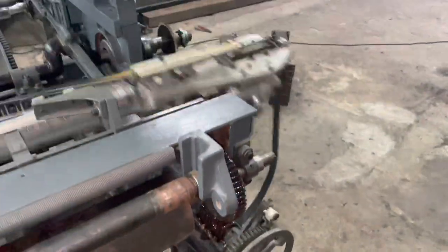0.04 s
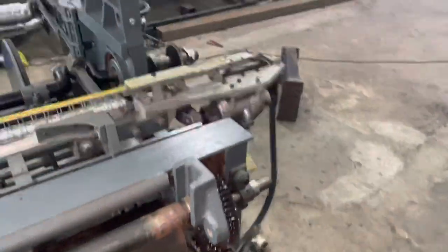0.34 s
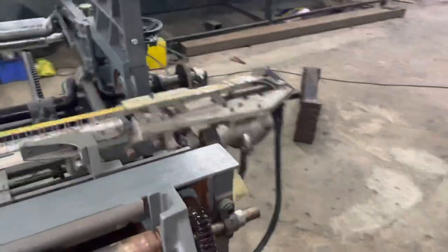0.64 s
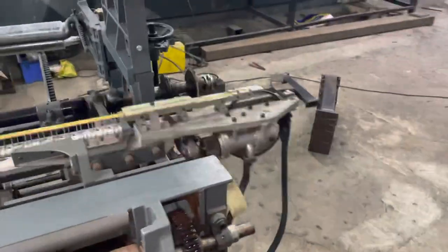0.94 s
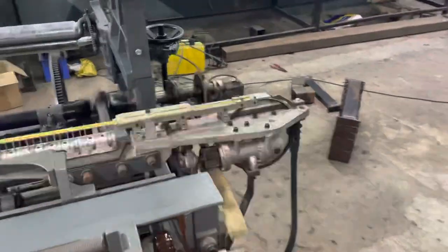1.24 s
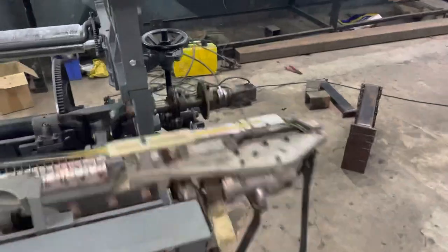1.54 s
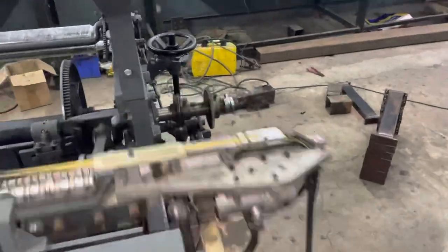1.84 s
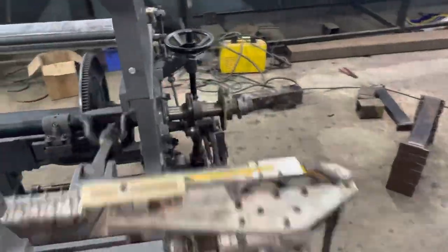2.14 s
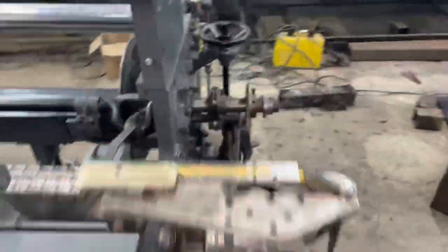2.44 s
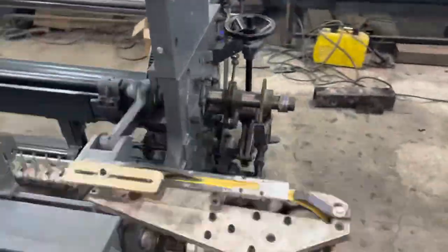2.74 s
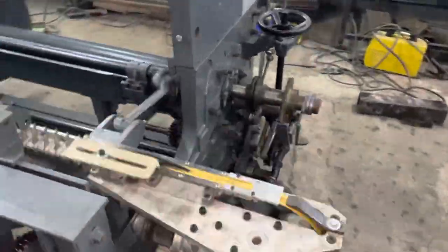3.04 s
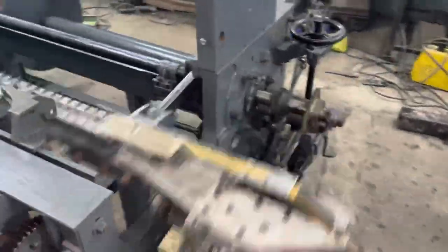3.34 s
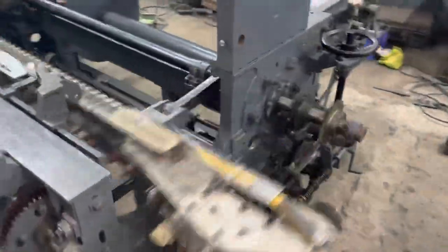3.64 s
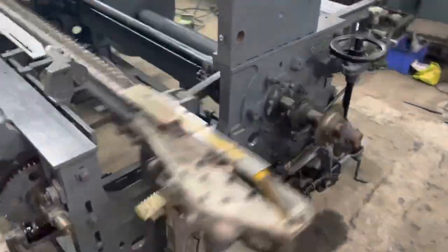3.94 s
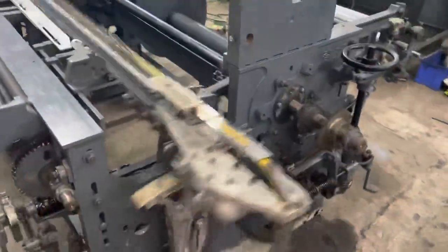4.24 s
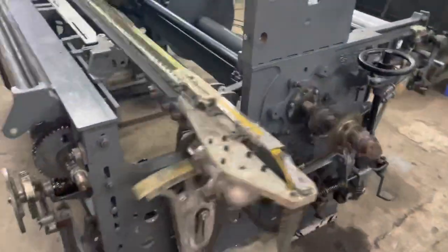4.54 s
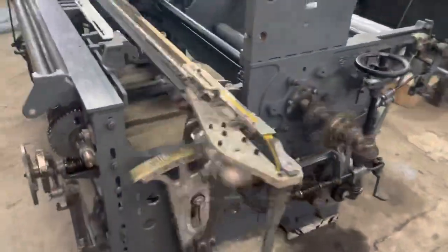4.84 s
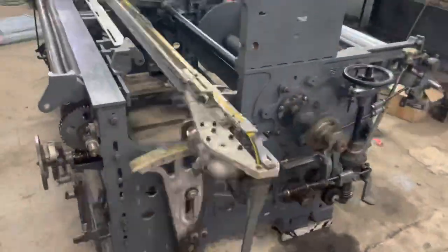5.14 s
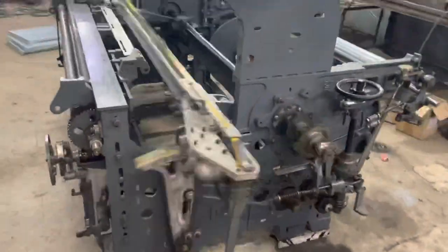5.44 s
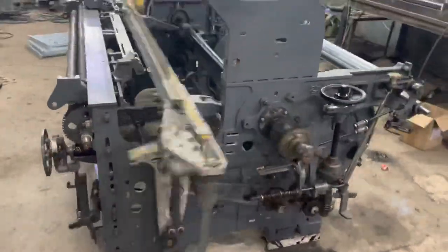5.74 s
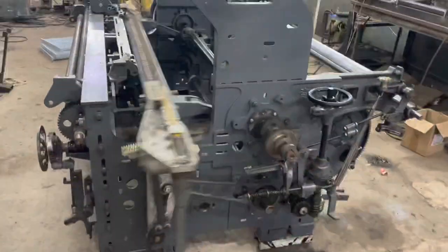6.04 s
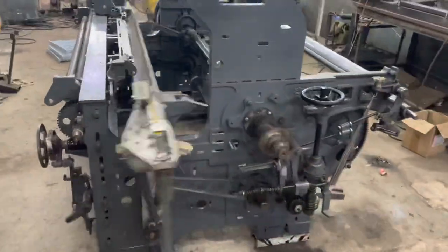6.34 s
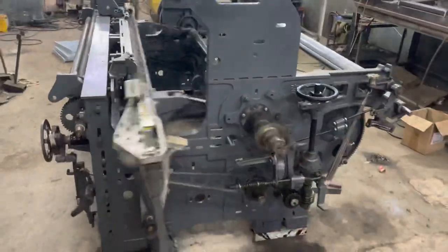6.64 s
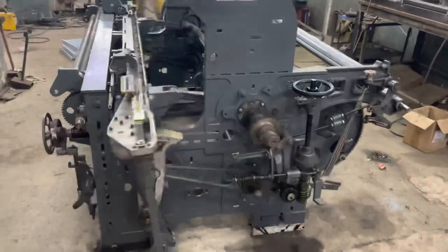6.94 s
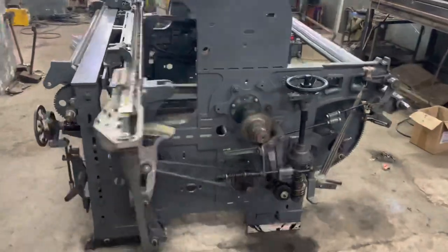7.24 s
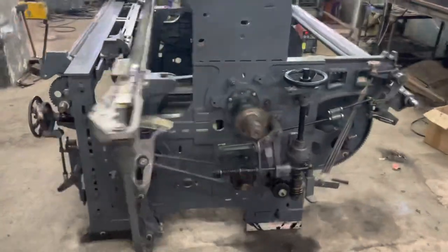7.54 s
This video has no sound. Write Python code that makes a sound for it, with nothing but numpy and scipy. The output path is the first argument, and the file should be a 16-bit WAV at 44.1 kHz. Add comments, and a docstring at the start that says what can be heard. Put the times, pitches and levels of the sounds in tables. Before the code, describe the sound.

Regular metallic beats and hollow knocks from a running loom, with gear grind, sliding hiss and motor hum in a concrete room.

```python
"""A concrete workshop, heard while walking round the end of a rapier loom.
The heavy frame rumbles and the motor hums. About three times a second a tape carries the thread across:
one "pick". Each pick brings a steel clash as the drive reverses, a tick from the tape guide, a hollow
knock from loose joints and a tiny squeak; then the gears growl and the tape slides out."""
import sys
import numpy as np
from scipy import signal
from scipy.fft import rfft, irfft, next_fast_len
from scipy.io import wavfile

SR = 44100
rng = np.random.default_rng(int(sys.argv[2]) if len(sys.argv) > 2 else 0)


def materialize(psi):
    """Save the field psi as 16-bit PCM at rate SR to the path in sys.argv[1].

    A 1-D psi becomes a single channel; in a 2-D psi each row is a channel.
    """
    bounded = np.clip(np.atleast_2d(psi).T, -1, 1)
    quanta = np.round(bounded * 32767).astype(np.int16)
    wavfile.write(sys.argv[1], SR, quanta)


N = 334278
TIME = np.arange(N) / SR
FFT_SIZE = next_fast_len(N + SR, real=True)
FREQS = np.arange(FFT_SIZE // 2 + 1) * SR / FFT_SIZE
FIRST_CLASH_S, PICK_S = 0.06495, 0.324737  # the crank turns steadily, one pick a turn


def from_db(db):
    """Turn decibels into a gain."""
    return 10 ** (np.asarray(db) / 20)

def along(rows, t=TIME):
    """Each column of a curve, read at the times t."""
    times, *columns = np.transpose(rows)
    return [np.interp(t, times, column) for column in columns]

def over_hz(points):
    """Join a table's points into a curve over all frequencies."""
    hz, value = np.transpose(points)
    return np.interp(np.log(FREQS + 1e-3), np.log(hz), value)

def colour(x, spectrum):
    """Make some broad ranges of pitch louder than others."""
    return irfft(rfft(x, FFT_SIZE) * from_db(over_hz(spectrum)), FFT_SIZE)[:, :N]

def resonate(force, modes):
    """Make a part ring at its own notes (modes); narrower ones ring longer."""
    out = 0
    for k, (hz, width, db) in enumerate(modes):
        r = np.exp(-np.pi * width / SR)
        gain = (-1) ** k * from_db(db) * (1 - r * r) / 2
        feedback = [1, -2 * r * np.cos(2 * np.pi * hz / SR), r * r]
        out = out + signal.lfilter([gain, 0, -gain], feedback, force + 1e-18)
    return out

def noise():
    """Two unrelated channels of even hiss."""
    return rng.standard_normal((2, N)) * np.sqrt(SR / 2)

def scatter(shape):
    """Random numbers between -2 and 2, mostly small."""
    return np.clip(rng.standard_normal(shape), -2, 2)

def chatter(per_s, spread_db):
    """The force of many tiny contacts of uneven strength."""
    contact = np.cumsum(rng.random(N) < per_s / SR)
    strength = from_db(spread_db * scatter(N + 1))[contact]
    return noise() * strength / np.sqrt(np.mean(strength ** 2))

def blows(rows, rise_s, hold_s, t60):
    """The outline of each blow: it builds, holds, then fades by 60 dB in t60 seconds."""
    out = np.zeros(N)
    for s, db in rows:
        near = slice(*np.searchsorted(TIME, [s - rise_s, s + hold_s + t60]))
        age = TIME[near] - s
        fade = np.exp(-np.log(1000) * np.maximum(age - hold_s, 0) / t60)
        out[near] += np.minimum(1 + age / rise_s, 1) * from_db(db) * fade
    return out

def taps(rows, gain_db):
    """One clean click of force for each touch."""
    s, db = np.transpose(rows)
    out = np.zeros(N)
    out[np.round(s * SR).astype(int)] = SR * from_db(db + gain_db)
    return out

def every_pick(levels, after_clash_s, uneven_db, play_s=0.000624):
    """One contact a pick, a little uneven as the joints are loose: rows of (time [s], level [dB])."""
    s = np.arange(FIRST_CLASH_S + after_clash_s, N / SR - .01, PICK_S)
    late, harder = scatter((len(s), 2)).T
    return np.c_[s + play_s * late, along(levels, s)[0] + uneven_db * harder]


# the hall's wash of noise: (frequency [Hz], level [dB])
HALL_SPECTRUM = [(60, -62), (110, -54), (160, -54), (300, -57), (450, -58.5), (620, -60), (900, -59),
                 (1200, -63.5), (1700, -66), (3500, -71.5), (5700, -76), (7400, -75), (12000, -78.5),
                 (16000, -87)]
# how well each part is heard on the walk:
# (time [s], tape [dB], gears [dB], rubbed guide [dB], gear cover [dB])
WALK = [(0, -0.5, 0, -2.5, 5), (1, -1.5, 0.5, -1.5, -3.5), (2.2, 0.5, -0.5, -2, 6), (3, -1, 0.5, -1.5, -10),
        (3.8, -2, 1.1, -3, -4), (4.7, -3.5, 1.06, -3, 0), (5.4, -4, .5, -5, -2), (6.2, -6, 0.4, -5.5, -1),
        (7.58, -5, 0.4, -7, -2)]

def hall_wash():
    """Machine noise fills the hall, following the level of the gears."""
    _, gears_db, _, _ = along(WALK)
    return colour(noise(), HALL_SPECTRUM) * from_db(gears_db)

# the frame's deep rumble: (frequency [Hz], level [dB])
RUMBLE_SPECTRUM = [(20, -74), (32, -65), (42, -52), (52, -46.5), (70, -48), (100, -52), (135, -60),
                   (200, -67.5), (400, -105)]
# its loudness on the walk: (time [s], level [dB])
RUMBLE_LEVELS = [(0, 2.5), (1.6, -1), (2.4, -1), (3.4, -0.5), (4.4, 1.5), (5.6, -0.5), (6.4, -0.5),
                 (7.58, 0.5)]

def frame_rumble(shakes_per_s=14, shake_db=0.5):
    """The heavy frame shakes unevenly."""
    wander = np.interp(TIME * shakes_per_s, np.arange(1000), rng.standard_normal(1000))
    return colour(noise() * from_db(shake_db * wander + along(RUMBLE_LEVELS)[0]), RUMBLE_SPECTRUM)

# notes of the motor and belt: (pitch [Hz], width [Hz], level [dB])
MOTOR_MODES = [(85.4, 5.1, -42.5), (164, 26, -62.5), (396.6, 6.5, -56), (782.6, 15, -55)]
# the lowest note on the walk: (time [s], level [dB])
LOW_HUM_LEVELS = [(0, -12), (1.1, -8.5), (2.0, -0.5), (2.8, 2), (3.3, 3), (4.1, -2.5), (4.9, 0.5),
                  (5.7, -3), (6.7, -6), (7.58, -1)]

def motor_hum():
    """The motor and belt hum with a few wavering notes."""
    lowest = resonate(noise() * from_db(along(LOW_HUM_LEVELS)[0]), MOTOR_MODES[:1])
    return lowest + resonate(noise(), MOTOR_MODES[1:])

# effort during one pick: (time after the clash [s], tape friction [dB], gear load [dB])
STROKE = [(0, -13, -5), (.03, -2.5, -3.5), (.06, -9, -19.5), (.11, -12, -12), (.135, -23, -4),
          (.155, -2.5, -9.5), (.185, 1.5, -1), (.215, -0.5, -1), (.24, 0.5, -7), (.265, -5, -7),
          (.295, 0.5, -5), (.325, -1, -4)]
# the gears' growl: (frequency [Hz], level [dB])
GEAR_SPECTRUM = [(60, -75), (150, -61), (300, -60.5), (450, -58), (650, -63.5), (900, -56.5), (1600, -59.5),
                 (2200, -67.5), (3500, -69), (6000, -81.5), (16000, -100)]
# notes of the parts the gears shake: (pitch [Hz], width [Hz], level [dB])
FRAME_MODES = [(279.6, 10, -63), (391, 30, -57.5), (788, 9.5, -58), (830, 14, -52), (897, 11, -68),
               (974, 16, -60), (1032, 20, -58), (1228, 8.9, -57)]
COVER_MODES = [(1580, 77, -73), (1650, 24, -60), (2200, 250, -69.5), (1916, 35, -54), (2400, 240, -64.5),
               (2574, 50, -54.5), (3040, 880, -71)]
RAIL_MODES = [(135, 25, -52), (779, 7, -54), (915, 16, -46), (975, 25, -54), (1228, 10, -54),
              (1600, 140, -60)]
SIDE_FRAME_MODES = [(424, 54, -55.5), (508, 46, -50.5), (573, 54, -55), (1233, 12, -54.5)]
DRIVE_END_MODES = [(150, 35, -52), (443, 35, -53), (715, 15, -51), (887, 24, -50.5), (968, 28, -51.5)]
FRONT_BEAM_MODES = [(175, 22, -53), (325, 57, -52.5), (813, 33, -51), (2120, 330, -65), (2384, 72, -62),
                    (2600, 37, -54)]
# the cross rail sings as the listener passes it: (time [s], level [dB])
RAIL_LEVELS = [(2.8, -18), (3.5, -11), (3.9, -3), (4.6, -0.5), (5.6, -7.5), (6.3, -14)]
# ringing on the walk: (time [s], tape edge [dB], side frame [dB], drive end [dB], front beam [dB])
PART_LEVELS = [(0, -9, -27, -6, -4.5), (1.5, -12, -6, -20, 1), (3.2, -13, 2, -18, -11),
               (4.2, -8, -9, -18, -18), (5.2, 1, -13, -5, -8), (6.1, -14, -14, -0.5, -15),
               (7.58, -20, -10, 2.5, -18)]

def gear_growl():
    """Gear teeth grind under load and shake the frame and their sheet-metal cover."""
    _, gears_db, _, cover_db = along(WALK)
    _, load_db = along(STROKE, (TIME - FIRST_CLASH_S) % PICK_S)
    _, side, end, front = from_db(along(PART_LEVELS))
    teeth = chatter(per_s=500, spread_db=3.5) * from_db(load_db + gears_db)
    # the linkage buzzes too, most of all close to the gears
    buzz = from_db(-13) * resonate(teeth * from_db(10.5 * gears_db), LINKAGE_MODES[1:3])
    parts = [(from_db(0.9 * gears_db), FRAME_MODES), (from_db(cover_db - 7.5), COVER_MODES),
             (from_db(along(RAIL_LEVELS)[0]), RAIL_MODES), (side, SIDE_FRAME_MODES),
             (end, DRIVE_END_MODES), (front, FRONT_BEAM_MODES)]
    ringing = sum(resonate(teeth * gain, modes) for gain, modes in parts)
    return colour(teeth, GEAR_SPECTRUM) + buzz + ringing

# the tape's hiss: (frequency [Hz], level [dB])
TAPE_SPECTRUM = [(500, -61.5), (2000, -65.5), (3500, -72.5), (5000, -85), (5800, -71.5), (7500, -78),
                 (10000, -65), (12500, -69.5), (16000, -79)]
# notes of its rubbed edge: (pitch [Hz], width [Hz], level [dB])
TAPE_EDGE_MODES = [(3940, 60, -76), (4570, 45, -69)]
# notes of the steel tape guide:
# (pitch [Hz], width [Hz], struck [dB], rubbed [dB], change in struck level on the walk [dB/s])
GUIDE_MODES = [(2905, 76, -57, -88, 0), (3193, 48, -48.5, -59, 0.7), (3530, 56, -52.5, -65, 1.3),
               (3876, 46, -50, -58, 1.5), (4280, 85, -52.5, -66.5, -1.2), (4664, 57, -50, -58.5, 0.1),
               (5060, 64, -54, -62.5, -1), (5400, 28, -52.5, -61, 2), (5820, 37, -61, -84, -3),
               (6000, 70, -59, -78, 2), (6350, 74, -61, -74, -2.5), (7220, 88, -57.5, -59, -2.5),
               (9100, 82, -66, -95, -6), (11700, 130, -59.5, -70, 1.5)]

def tape_slide():
    """The tape rubs through its guide, swelling and fading with each stroke."""
    tape_db, _, rubbed_db, _ = along(WALK)
    friction_db, _ = along(STROKE, (TIME - FIRST_CLASH_S) % PICK_S)
    sliding = chatter(per_s=1400, spread_db=2.0) * from_db(friction_db)
    hiss = colour(sliding * from_db(tape_db), TAPE_SPECTRUM)
    rubbed_modes = [(hz, width, db) for hz, width, _, db, _ in GUIDE_MODES]
    guide = resonate(sliding * from_db(rubbed_db), rubbed_modes)
    edge = resonate(sliding * from_db(along(PART_LEVELS)[0]), TAPE_EDGE_MODES)
    return hiss + guide + edge

def struck_guide(force, uneven_db, count, mid_walk_s=3.8):
    """The struck guide rings; the mix of its notes shifts with each pick and along the walk."""
    pick = ((TIME - FIRST_CLASH_S) / PICK_S + .5).astype(int)
    out = 0
    for k, (hz, width, db, _, db_per_s) in enumerate(GUIDE_MODES[:count]):
        shift_db = uneven_db * scatter(pick[-1] + 1)[pick] + db_per_s * (TIME - mid_walk_s)
        out = out + (-1) ** k * resonate(force * from_db(shift_db), [(hz, width, db)])
    return out

# knocks of the frame, and the gears' scrape on the walk: (time [s], level [dB])
THUMPS = [(0.279, -8), (0.597, -4), (0.926, -5), (1.243, 5), (1.573, 2), (1.897, -4), (2.216, 0.5),
          (2.539, -2), (2.854, -5), (3.205, -3), (3.518, 1), (3.83, 0), (4.169, 4), (4.494, 4.5),
          (4.803, 4), (5.125, 5.5), (5.449, -1), (5.781, 2), (6.105, 1), (6.446, 2), (6.779, -2),
          (7.103, -7), (7.402, -2.1)]
SCRAPE_LEVELS = [(0, 2), (1.3, 4), (2.2, -4), (3, -1), (4, -1), (4.8, 2), (6, -6), (7.58, -12)]
# low notes of the knocked frame: (pitch [Hz], width [Hz], level [dB])
THUMP_MODES = [(225, 31, -55), (291, 39, -54.5), (417, 50, -48.5), (540, 44, -55), (815, 18, -58),
               (898, 110, -57)]

def full_load():
    """At the height of the stroke the frame knocks and the gears scrape their cover."""
    thump = noise() * blows(THUMPS, rise_s=0.0028, hold_s=0.0094, t60=0.055)
    grit = chatter(per_s=420, spread_db=4.5)
    scrapes = every_pick(SCRAPE_LEVELS, after_clash_s=.21, uneven_db=4.3)
    scrape = grit * blows(scrapes, rise_s=0.028, hold_s=0.011, t60=0.19)
    return from_db(-1) * resonate(thump, THUMP_MODES) + from_db(0.5) * resonate(scrape, COVER_MODES)

# brief squeals of the tape: (time [s], level [dB])
SQUEALS = [(4.46, -4), (5.085, -1), (5.135, -2), (5.19, -10), (5.44, -1)]
# the tape's high ping: (pitch [Hz], width [Hz], level [dB])
PING_MODE = [(4780, 120, -55.5)]

def tape_squeal():
    """The tape's edge scrapes against its guide and both ring."""
    rub = chatter(per_s=570, spread_db=3.0) * blows(SQUEALS, rise_s=0.026, hold_s=0.016, t60=.07)
    guide = resonate(rub, [mode[:3] for mode in GUIDE_MODES[4:7]])
    return from_db(-7) * guide + from_db(-5) * resonate(rub, PING_MODE)

# ticks of the loose guide, and slaps of the tape against it: (time [s], level [dB])
TICKS = [(.158, -2), (.482, 1), (.806, -5), (1.131, -6), (1.455, -0.5), (1.780, -2.5), (2.104, -0.5),
         (2.429, -2.5), (2.753, 3.5), (3.078, 1.5), (3.404, 0.5), (3.729, -2), (4.053, -8), (4.377, -1),
         (4.703, -2), (5.026, -1), (5.350, -3), (5.676, 1), (6.001, 1), (6.326, 0), (6.649, -1.5),
         (6.976, -5)]
SLAPS = [(3.224, -7), (3.56, -4.5), (3.884, -8), (3.891, -10), (4.517, -5), (4.844, -2), (4.854, -15),
         (5.494, -3), (5.501, -8), (5.508, -6), (5.819, -5.5), (6.145, -8), (6.474, -15)]
# the tape's scuff, snatch and squeak on the walk: (time [s], level [dB])
SCUFF_LEVELS = [(1.3, -20), (2, 2.5), (2.7, -3), (3.3, 3), (4, -1), (4.6, -5), (5.2, -20)]
SNATCH_LEVELS = [(0, 7.5), (2.2, 7), (3, 4), (4.4, 5.5), (5.3, -13), (6, -33)]
SQUEAK_LEVELS = [(0, 9), (1.2, 3), (3, 12), (4.3, 4), (5.4, 4), (6, -33)]
# a small, bright click: (frequency [Hz], level [dB])
CLICK_SPECTRUM = [(500, -101), (2000, -72), (4500, -69), (6000, -70.5), (8500, -66.5), (12000, -71),
                  (16000, -78)]
# notes of the squeaky joint: (pitch [Hz], width [Hz], level [dB])
JOINT_MODES = [(2280, 100, -71), (6200, 410, -71.5), (12640, 450, -65), (12800, 480, -62.5)]

def small_contacts():
    """The tape scuffs home, the guide ticks, the tape is snatched with a squeak and slaps going out."""
    scuffs = every_pick(SCUFF_LEVELS, after_clash_s=-.013, uneven_db=-1.5)
    scuff = noise() * blows(scuffs, rise_s=.002, hold_s=.003, t60=0.049)
    tick = noise() * blows(TICKS, rise_s=0.0014, hold_s=0.0024, t60=0.024)
    slap = noise() * blows(SLAPS, rise_s=0.00087, hold_s=0.0017, t60=0.0072)
    snatches = every_pick(SNATCH_LEVELS, after_clash_s=.1425, uneven_db=1.5)
    snatch = noise() * blows(snatches, rise_s=.001, hold_s=0.0014, t60=0.024)
    squeaks = every_pick(SQUEAK_LEVELS, after_clash_s=.146, uneven_db=0.5)
    squeak = noise() * blows(squeaks, rise_s=0.00069, hold_s=0.0017, t60=0.02)
    on_guide = from_db(-4) * tick + from_db(5) * slap + from_db(-13) * scuff
    guide = struck_guide(on_guide, uneven_db=2.5, count=8)
    clicks = from_db(3) * tick + from_db(4) * slap + from_db(-1) * snatch + from_db(5.5) * scuff
    pings = from_db(1) * (resonate(tick, PING_MODE) + resonate(snatch, PLATE_MODES))
    return guide + colour(clicks, CLICK_SPECTRUM) + pings + from_db(4.5) * resonate(squeak, JOINT_MODES)

def knock(rows):
    """The force of a loose joint closing: one firm tap and a brief judder."""
    judder = noise() * blows(rows, rise_s=0.0014, hold_s=0.014, t60=0.22)
    return taps(rows, gain_db=-23) + from_db(-5.5) * judder

# one knock a pick: (time [s], lever [dB], linkage [dB], crank rod [dB])
KNOCKS = [(.182, -5, -8, -5), (.507, -9, -4, -6), (.832, -9, -5, -5), (1.160, -2, 1, 5), (1.483, 0, 0, 4),
          (1.805, 2, 2, 2), (2.131, 3, 3, 4), (2.455, 0, 0, 3), (2.779, 2, 2, -1), (3.104, 5, 3.5, -10),
          (3.429, 4.5, 1, -3), (3.754, 0, -5, -10), (4.080, 0, 4.5, -10), (4.404, -2, 6, -8),
          (4.730, -2, 4.5, -4), (5.054, -5, 5.5, -8), (5.378, -2, 4.5, -5), (5.702, -5, 4, 1),
          (6.028, -1, 1, 3), (6.352, -4, 4.5, 0), (6.678, -12, 0, 3), (7.002, -14, 5, -2),
          (7.328, -19, 3, -3)]
# notes of those three parts: (pitch [Hz], width [Hz], level [dB])
LEVER_MODES = [(1096, 34, -47), (1152, 44, -50), (1235, 33, -47), (15000, 150, -67)]
LINKAGE_MODES = [(810, 40, -57), (914, 19, -53.5), (1058, 27, -50), (1545, 46, -58.5), (2290, 56, -64)]
ROD_MODES = [(1016, 78, -54), (1214, 30, -53.5)]

def linkage_knocks(link_lag_s=0.001913, rod_lag_s=0.00488):
    """Lever, linkage and crank rod take up their slack almost together: one hollow knock."""
    s, lever_db, link_db, rod_db = np.transpose(KNOCKS)
    lever = knock(np.c_[s, lever_db])
    link = knock(np.c_[s + link_lag_s, link_db])
    rod = knock(np.c_[s + rod_lag_s, rod_db])
    ringing = resonate(lever, LEVER_MODES) + resonate(link, LINKAGE_MODES) + resonate(rod, ROD_MODES)
    return ringing + from_db(-13) * colour(link, CLICK_SPECTRUM)

# clashes that ring out: (time [s], pitch [Hz], level [dB])
RINGING_HITS = [(0.7177, 3950, -48.5), (3.6397, 3170, -47), (3.9643, 3185, -50), (4.6135, 2406, -46),
                (6.237, 3720, -48), (6.237, 6070, -49.5)]

def ringing_hits(width_hz=43):
    """A blow that lands squarely sets one steel part ringing above the rest."""
    return sum(resonate(taps([(s, 0)], gain_db=-18.5), [(hz, width_hz, db)])
               for s, hz, db in RINGING_HITS)

# one clash a pick: (time [s], steel [dB], sizzle [dB], plate ring [dB], frame thud [dB])
CLASHES = [(0.0692, -4.5, -1, -11, -4), (0.3944, -3.5, -1, -8, 0), (0.7177, -2.5, 1.5, -4.1, -1.5),
           (1.043, 0, 3, 4, -7), (1.368, -4, 2, -2, -14), (1.6911, 0, -1, 10, 0.5), (2.017, 1, 1, -5, 2.5),
           (2.34, 0, 2, 0, 3.5), (2.6643, 0, -0.5, 2, -2.5), (2.9894, 1, 1.5, 6, -5),
           (3.3156, 3, -3, 10, 0), (3.6404, 0, 0, 8, 3.5), (3.9636, -2, 2, 2, 3),
           (4.2898, -2.5, -0.5, -3, 2.5), (4.6129, -1.5, -5, 6, 2), (4.9375, 0, -1, 6, -4),
           (5.2638, 1.5, -0.5, 9, 1.5), (5.5882, -1, 2, 3, 0.5), (5.913, -0.5, 1.5, -5, -5),
           (6.237, 1.5, -3, -7, 0), (6.563, -1, -2, -10, 2), (6.8877, -0.5, -4, -4, -0.5),
           (7.2117, -1, 1.5, -1, 0), (7.536, -1.5, -3, -7, -3)]
# the strikes within a clash: (time from the main strike [s], level [dB])
STRIKES = [(-.0036, 5.5), (0, 6.5), (.0028, 2), (.0052, 2)]
# the steel's crash, the bright rattle on top and the frame's dull thud: (frequency [Hz], level [dB])
STEEL_SPECTRUM = [(900, -75), (1600, -63), (2800, -64), (5000, -72), (5800, -71.5), (7400, -59),
                  (9200, -56.5), (10500, -66), (12000, -80), (16000, -88)]
SIZZLE_SPECTRUM = [(7000, -63.5), (10000, -58), (12000, -62), (13200, -62.5), (15000, -70), (16000, -73)]
THUD_SPECTRUM = [(60, -60), (160, -65), (400, -51), (650, -58), (950, -53), (1500, -62.5), (2500, -65),
                 (6000, -92)]
# notes of the plate: (pitch [Hz], width [Hz], level [dB])
PLATE_MODES = [(2377, 64, -59), (2610, 62, -58)]
# the struck guide's ring on the walk: (time [s], level [dB])
GUIDE_LEVELS = [(0, 2), (.6, 4.5), (1.3, -2.5), (2.1, 4.5), (3.3, -1.5), (4.4, 7), (5.5, -1), (6.2, 2),
                (6.7, -3.5), (7.58, -7)]

def steel_clash(play_s=0.00022):
    """Steel parts touch, strike, bounce twice and rattle; guide and plate ring, then the frame thuds."""
    beats, steel_db, sizzle_db, plate_db, thud_db = np.transpose(CLASHES)
    late, harder = scatter((2, len(STRIKES), len(beats)))
    strikes = 0
    for k, (s, db) in enumerate(STRIKES):
        hits = np.c_[beats + s + play_s * late[k], db + 1.2 * harder[k]]
        strikes = strikes + blows(hits, rise_s=0.00008, hold_s=0.00032, t60=0.0073)
    rattle = blows([(s + 0.0012, -2.5) for s in beats], rise_s=0.0066, hold_s=0.0077, t60=0.084)
    force = chatter(per_s=1900, spread_db=3.0) * rattle + noise() * strikes
    nearest = np.searchsorted((beats[1:] + beats[:-1]) / 2, TIME)  # the clash closest to each moment
    on_steel = force * from_db(steel_db)[nearest]
    steel = from_db(1.5) * colour(on_steel, STEEL_SPECTRUM)
    fizz = chatter(per_s=950, spread_db=0.5) * rattle + from_db(-2.5) * noise() * strikes
    sizzle = colour(fizz * from_db(sizzle_db)[nearest], SIZZLE_SPECTRUM)
    on_guide = from_db(-2) * on_steel + taps(np.c_[beats, steel_db], gain_db=-24.5)
    guide = struck_guide(on_guide, uneven_db=1.5, count=len(GUIDE_MODES))
    guide *= from_db(along(GUIDE_LEVELS)[0] - 5)
    plate = resonate(force * from_db(plate_db)[nearest], PLATE_MODES)
    jolt = noise() * blows(np.c_[beats + .005, thud_db], rise_s=0.01, hold_s=0.012, t60=0.21)
    thud = colour(jolt, THUD_SPECTRUM) + from_db(4) * resonate(jolt, FRAME_MODES)
    return steel + sizzle + guide + from_db(-1) * plate + from_db(-1.5) * thud

def wall_echo(x, t60, cutoff_hz, echo_db):
    """Concrete walls add a dense, duller echo."""
    age = TIME[:SR]
    tail = rng.standard_normal((2, SR)) * np.exp(-np.log(1000) * age / t60) * (age > .008)
    tail = tail / np.sqrt(np.sum(tail ** 2) / 2)
    tail = signal.sosfilt(signal.butter(1, cutoff_hz, fs=SR, output="sos"), tail)
    return x + from_db(echo_db) * signal.fftconvolve(x, tail, axes=1)[:, :N]

def scene():
    """The loom echoes in its workshop, over the rumble, hum and wash."""
    loom = steel_clash() + ringing_hits() + small_contacts() + tape_squeal() + linkage_knocks()
    loom = loom + full_load() + tape_slide() + gear_growl()
    echoing = wall_echo(loom, t60=0.55, cutoff_hz=6240, echo_db=-8)
    return echoing + frame_rumble() + motor_hum() + hall_wash()

# how alike left and right are: (frequency [Hz], likeness [0-1])
LIKENESS = [(60, 0.99), (130, 0.95), (290, 0.85), (640, 0.42), (1400, 0.1), (2600, 0.32), (5000, 0.22),
            (6800, 0.56), (7800, 0.97), (8700, 1), (10000, 1), (12000, 1), (13500, 1)]
# how far the left wave runs ahead, and the extra once the loom is on the left:
# (frequency [Hz], lead [radians])
LEFT_LEAD = [(500, 0), (1200, .5), (2300, .3), (3300, 1.1), (5000, 1.0), (5800, -1.1), (6800, -1.2),
             (7700, -2.8), (8700, -3.14), (9600, -3.6), (11200, -4.7), (12000, -5.8), (12800, -6.28)]
EXTRA_LEAD = [(80, .02), (400, 0.3), (900, 0.2), (1400, .3), (2500, 0.16)]
# how far the loom lies to the left: (time [s], share [0-1])
TURNED = [(4.4, 0.067), (6.5, 1)]
# how much louder the left side is: (frequency [Hz], left minus right [dB])
BALANCE = [(60, 1), (300, 1), (700, 3), (1400, 2), (2800, 0.8), (5500, 3.5), (9000, -1.7)]

def record(dry):
    """Left and right share the bass and fall out of step in the treble; loud peaks are rounded."""
    left, other = rfft(dry, FFT_SIZE)
    alike = np.clip(over_hz(LIKENESS), 0, 1)
    right = (alike * left + np.sqrt(1 - alike ** 2) * other) * np.exp(-1j * over_hz(LEFT_LEAD))
    tilt = from_db(over_hz(BALANCE) / 2)
    left, right = left * tilt, right / tilt
    right_at_end = right * np.exp(-1j * over_hz(EXTRA_LEAD))
    left, right, right_at_end = irfft(np.array([left, right, right_at_end]), FFT_SIZE)[:, :N]
    turned = np.clip(along(TURNED)[0], 0, 1)
    pair = np.tanh([left, (1 - turned) * right + turned * right_at_end])
    # cut the deepest bass and the highest treble
    pair = signal.sosfilt(signal.butter(6, 34, "high", fs=SR, output="sos"), pair)
    return signal.sosfilt(signal.ellip(12, .1, 80, 15850, fs=SR, output="sos"), pair)


dry = scene()
out = record(dry)
materialize(out)
```